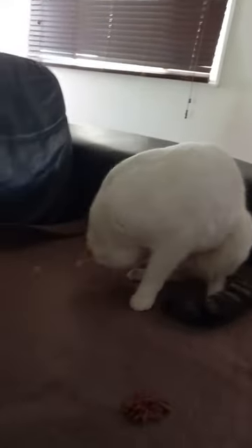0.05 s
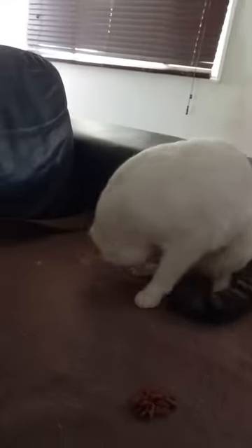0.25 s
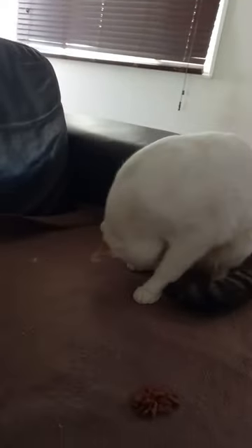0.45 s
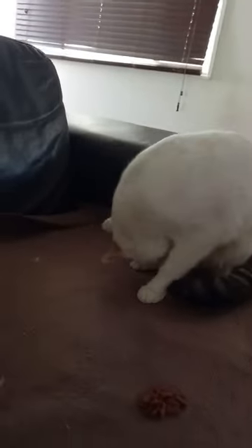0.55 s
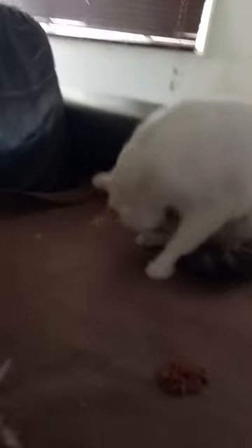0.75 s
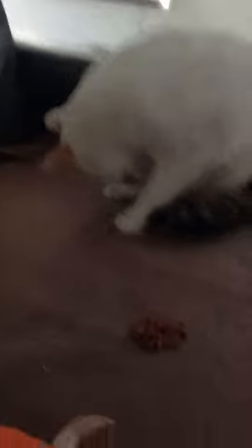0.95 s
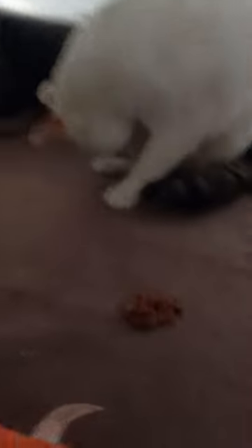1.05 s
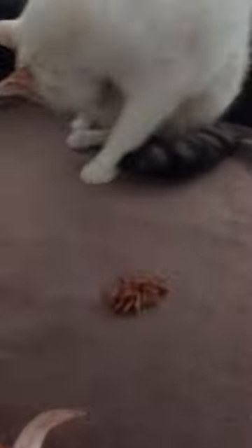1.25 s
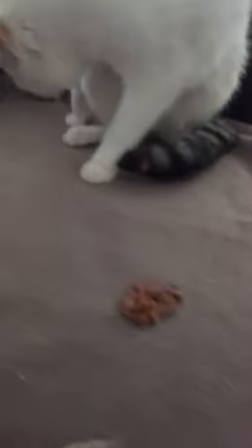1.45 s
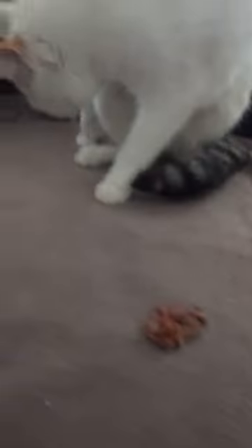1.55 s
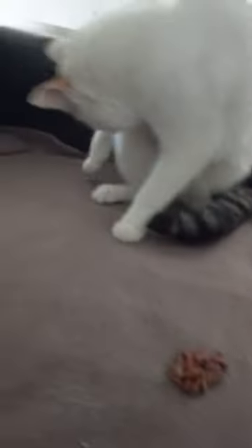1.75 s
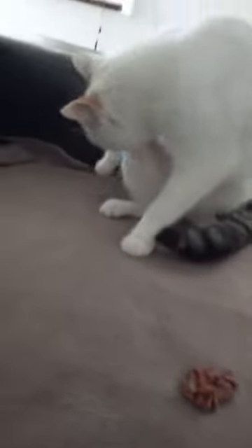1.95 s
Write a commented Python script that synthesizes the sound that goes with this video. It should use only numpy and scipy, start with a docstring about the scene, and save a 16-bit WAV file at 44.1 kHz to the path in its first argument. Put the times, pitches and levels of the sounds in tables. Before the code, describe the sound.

A cat's close, drawn-out growl climbs to a wavering yowl, with soft microphone bumps.

```python
"""A faint hiss, low room noise and brushing cloth open the scene; then a cat growls close by.
Its unsteady vocal folds drive the resonance of its mouth: the low, raspy growl climbs, breaks into
a thin wavering yowl and sinks away in a small room. The hand moves the microphone and bumps it
softly, and there are a few small ticks and one sharper knock."""
import sys
import numpy as np
from scipy import signal
from scipy.fft import rfft, irfft
from scipy.io import wavfile

SR = 44100
rng = np.random.default_rng(int(sys.argv[2]) if len(sys.argv) > 2 else 0)


def to_wav(sig):
    """Store sig (one row per channel, or 1-D mono) as 16-bit WAV at the path in sys.argv[1].

    Samples outside -1..1 are clipped; the rate is SR.
    """
    pcm = np.clip(np.atleast_2d(sig), -1, 1) * 32767
    pcm = np.round(pcm).astype(np.int16)
    wavfile.write(sys.argv[1], SR, pcm.T)  # frames by channels


N = 88200
TIME, FREQ_HZ = np.arange(N) / SR, np.fft.rfftfreq(N, 1 / SR)


def amp(db):
    """Amplitude grows tenfold every 20 dB."""
    return 10 ** (np.asarray(db) / 20)


def unit_rms(x):
    """Normalisation to unit mean power."""
    return x / np.sqrt(np.mean(x ** 2) + 1e-20)


def spectrum_at(table, hz):
    """Interpolation on a logarithmic frequency axis."""
    table_hz, values = np.transpose(table)
    return np.interp(np.log(hz + 1), np.log(table_hz), values)


def curves(table):
    """Linear interpolation of each column over time."""
    time_s, *columns = np.transpose(table)
    return [np.interp(TIME, time_s, column) for column in columns]


def wobble(rate_hz):
    """Low-pass noise: random motion up to a given rate."""
    white = rfft(rng.standard_normal(N))
    return unit_rms(irfft(white / np.sqrt(1 + (FREQ_HZ / rate_hz) ** 4), N))


def pan(balance_db):
    """Constant-power panning; balance is the left level minus the right."""
    half_db = np.atleast_1d(balance_db) / 2
    gains = amp([half_db, -half_db])
    return gains / np.sqrt(np.mean(gains ** 2, axis=0))


# Likeness of left and right noise: frequency_hz, correlation (clipped to -1..1)
CORRELATION = [(60, -0.56), (130, 2.3), (290, 0.52), (640, -0.5), (1400, 0), (15000, 0)]
def stereo_noise(spectrum, balance_db):
    """Partial coherence: two channels of coloured noise share much of their upper bass."""
    left, independent = rfft(rng.standard_normal((2, N)))
    correlation = np.clip(spectrum_at(CORRELATION, FREQ_HZ), -1, 1)
    right = correlation * left + np.sqrt(1 - correlation ** 2) * independent
    panned = np.array([left, right]) * pan(balance_db)
    return unit_rms(irfft(panned * amp(spectrum_at(spectrum, FREQ_HZ)), N))


# Room noise spectrum: frequency_hz, relative_db
AMBIENT_SPECTRUM = [(20, -53), (40, -31), (75, -0.5), (125, -15.5), (195, -6), (300, -2.5), (480, -4.5),
                    (1000, -15), (2000, -31), (3400, -38), (4300, -43.5), (6600, -43), (8000, -42.5),
                    (12000, -43), (15500, -47.5)]
# Its stereo position: frequency_hz, balance_db
AMBIENT_BALANCE = [(60, 6.5), (200, -5.5), (400, -12.5), (1300, 11.5), (2400, -5), (8000, 14),
                   (15000, -1.5)]
def room_noise(level_db=-58.5):
    """Stationary noise with most of its power at low frequencies."""
    return amp(level_db) * stereo_noise(AMBIENT_SPECTRUM, spectrum_at(AMBIENT_BALANCE, FREQ_HZ))


# Hiss spectrum: frequency_hz, relative_db
HISS_SPECTRUM = [(600, 5), (1300, 2), (2200, -5.5), (2900, -7), (3150, -6), (3400, -4.5), (3650, -11),
                 (3950, -18), (6000, -57)]
# Hiss envelope: time_s, level_db
HISS_ENVELOPE = [(0, -61), (.13, -62.5), (.3, -65), (.55, -74), (.8, -70), (1.1, -77.5), (1.55, -72.5),
                 (1.72, -78)]
def hiss():
    """Band-limited noise under a slow envelope, strongest at the start."""
    return amp(curves(HISS_ENVELOPE)[0]) * stereo_noise(HISS_SPECTRUM, balance_db=-14.5)


# Friction spectrum: frequency_hz, relative_db
CLOTH_SPECTRUM = [(1500, -2), (2800, -1), (4200, -3), (6600, 7), (8000, 0.5), (10000, 0), (13000, -5),
                  (15500, -6.5)]
# Brushing strokes: time_s, level_db
CLOTH_ENVELOPE = [(0, -71.5), (.08, -73), (.18, -83.5), (.55, -78), (.76, -77.5), (.94, -68.5), (1.06, -73),
                  (1.2, -72), (1.31, -74.5), (1.48, -63.5), (1.62, -70), (1.72, -82)]
def cloth():
    """Sliding friction of cloth on the microphone makes bright, grainy noise."""
    friction = stereo_noise(CLOTH_SPECTRUM, balance_db=-8)
    grain_db = 1.1 * wobble(rate_hz=360)
    return friction * amp(curves(CLOTH_ENVELOPE)[0] + grain_db)


# Irregularity of the vocal folds: time_s, roughness (0-1)
ROUGHNESS = [(.22, 0.22), (.32, 0.44), (.37, .8), (.41, .15), (.57, 0.28), (.63, 0.58), (.75, 0.33),
             (.86, 0.08), (1.04, 0.4), (1.25, .12), (1.5, 0.3), (1.64, 0.7)]
# The cat's direction as the microphone turns, for 1 kHz and up: time_s, balance_db, left_lead_rad
CAT_DIRECTION = [(.25, -8, 0.2), (.42, -2, 1.2), (.56, -4, 0.92), (.72, -6, 0.65), (.92, -6, 1.76),
                 (1.1, 7, 2.5), (1.25, -3, 2.3), (1.45, -1, 1.82), (1.62, 2, 2)]
MOUTH_HZ, MOUTH_WIDTH_HZ = 921, 100
def voice(contour, pitch_hz, partials_db, mouth_db, jitter=0.022, shimmer=0.29, fade_s=0.012):
    """Source and filter: unsteady vocal folds emit harmonics, and air puffs ring the mouth resonance."""
    inside_s = np.minimum(TIME - contour[0][0], contour[-1][0] - TIME)
    gate = np.clip(inside_s / fade_s + 0.48, 0, 1)
    roughness, = curves(ROUGHNESS)
    unsteady_hz = pitch_hz * (1 + jitter * roughness * wobble(rate_hz=86))
    phase = 2 * np.pi * np.cumsum(unsteady_hz) / SR
    flutter = np.exp(shimmer * roughness * wobble(rate_hz=140))
    balance_db, lead_rad = curves(CAT_DIRECTION)
    airflow = rng.standard_normal(N) * (1 + np.cos(phase)) ** 3  # one puff per cycle
    mouth_band = np.exp(-((FREQ_HZ - MOUTH_HZ) / MOUTH_WIDTH_HZ) ** 2)
    puffs = unit_rms(irfft(rfft(airflow) * mouth_band, N))
    sound = amp(mouth_db - 10.5) * roughness * pan(balance_db) * puffs
    for k, level_db in enumerate(partials_db, 1):
        separation = np.minimum(k * pitch_hz / 1000, 1) ** 2.3  # low partials reach both sides alike
        stereo_phase = np.array([lead_rad, -lead_rad]) * separation / 2
        mouth_lag = np.arctan((k * pitch_hz - MOUTH_HZ) / MOUTH_WIDTH_HZ) + np.pi / 2
        waver_db = 0.98 * np.sqrt(k) * wobble(rate_hz=45)
        partial = np.cos(k * phase + stereo_phase - mouth_lag)
        sound -= amp(level_db + waver_db) * pan(balance_db * separation) * partial
    return np.sqrt(2) * gate * flutter * sound


# Low register, levels before gain: time_s, pitch_hz, fundamental_db, mouth_db
GROWL_CONTOUR = [(0.205, 199.6, -65, -81), (0.23, 200.3, -48.5, -66), (0.265, 187.9, -45.5, -58),
                 (0.3, 232, -38, -51), (0.335, 254.5, -43.5, -46), (0.36, 248.2, -47.5, -53),
                 (0.385, 307.9, -39.5, -44.5), (0.42, 309.5, -41, -43.0), (0.465, 305, -36, -42.5),
                 (0.51, 329.8, -44.5, -44), (0.55, 331.6, -38, -41.5), (0.595, 330.5, -38, -39),
                 (0.618, 317, -43, -45), (0.637, 350.5, -46, -43.5), (0.66, 349.4, -46, -68.5)]
# Mouth resonance as the jaw moves: time_s, centre_hz
MOUTH_GLIDE = [(.25, 946), (.29, 890), (.335, 725), (.37, 766), (.41, 852), (.55, 995.2)]
# Overtone colour with the resonance at MOUTH_HZ: frequency_hz, relative_db
VOCAL_TRACT = [(380, 6), (520, 2), (640, -2.5), (780, -3), (940, 3.5), (1060, -2.5), (1250, -15),
               (1600, -24), (2000, -58.5)]
def growl(gain_db=-2.5):
    """Formant filtering: the moving mouth shapes the overtones above a strong fundamental."""
    pitch_hz, fundamental_db, mouth_db = curves(GROWL_CONTOUR)
    formant_ratio = curves(MOUTH_GLIDE)[0] / MOUTH_HZ
    overtones_db = [mouth_db + spectrum_at(VOCAL_TRACT, k * pitch_hz / formant_ratio)
                    for k in range(2, 7)]
    return amp(gain_db) * voice(GROWL_CONTOUR, pitch_hz, [fundamental_db] + overtones_db, mouth_db)


# Reverberation time of the small room: frequency_hz, t60_s
ROOM_DECAY = [(150, 0.13), (400, 0.59), (1000, .28), (8000, 0.15)]
def in_room(direct, reverb_db):
    """Reverberation: sparse reflections follow the direct sound and linger longest near 400 Hz."""
    reflections = rng.standard_normal((2, SR // 2)) * (rng.random((2, SR // 2)) < 0.1)
    reflections[:, :150] = 0  # travel time of the first reflection
    hz, age_s, bands = signal.stft(reflections, SR, nperseg=256)
    decay = amp(-60 * age_s / spectrum_at(ROOM_DECAY, hz)[:, None])
    tail = signal.istft(bands * decay, SR, nperseg=256)[1]
    reverb = signal.fftconvolve(direct, tail / np.linalg.norm(tail[0]), axes=1)[:, :N]
    return direct + amp(reverb_db) * reverb


# Air noise in the throat: frequency_hz, relative_db
RASP_SPECTRUM = [(35, -49.5), (100, -15), (200, 4.5), (330, -0.5), (480, -6), (700, -4.5), (950, -11.5),
                 (1200, -10), (1600, -16.5), (2200, -22.5), (3500, -37.5), (8000, -53)]
# Breath envelope: time_s, level_db
RASP_ENVELOPE = [(.21, -76), (.28, -51.5), (.37, -52), (.5, -51), (.63, -49), (.74, -54.5), (.93, -53),
                 (1.05, -55), (1.22, -55.5), (1.48, -54.5), (1.6, -59.5), (1.7, -61.5)]
def rasp():
    """Turbulent air in the throat adds fluttering noise under both registers."""
    breath = stereo_noise(RASP_SPECTRUM, balance_db=-4)
    flutter_db = 1.23 * wobble(rate_hz=13)
    return breath * amp(curves(RASP_ENVELOPE)[0] + flutter_db)


# Nudges of the hand: start_s, length_s, level_db, centre_hz
HAND_BUMPS = [(0.292, 0.2, -60.5, 75), (0.414, 0.11, -59, 76.8), (.58, 0.069, -63.5, 82),
              (0.804, 0.092, -65.5, 76), (0.902, .14, -58.5, 80), (1.017, 0.067, -52, 227),
              (1.326, 0.15, -62.5, 76), (1.868, 0.11, -56.5, 202.4), (1.933, 0.043, -64, 75.1)]
def bumps(pitch_spread=0.14):
    """Structure-borne sound: each nudge shakes the microphone at a low, wandering frequency."""
    sound = np.zeros(N)
    for start_s, length_s, level_db, centre_hz in HAND_BUMPS:
        hz = centre_hz * (1 + pitch_spread * wobble(rate_hz=centre_hz / 2))
        swell = np.sin(np.pi * np.clip((TIME - start_s) / length_s, 0, 1))
        sound += amp(level_db) * swell * np.sin(2 * np.pi * np.cumsum(hz) / SR)
    return sound


# Small ticks: start_s, level_db, centre_hz, width_octaves, balance_db
TICK_BURSTS = [(0.611, -56.5, 10830, .8, -8.5), (.691, -57, 6167, 0.27, -8), (0.78, -57, 9000, 0.98, -5),
               (.829, -62, 13230, .4, -8), (0.9375, -51, 5150, 0.54, -4), (.945, -64, 10800, 0.64, 11),
               (0.9512, -46, 10040, 1, -23), (1.0045, -51, 10000, 0.95, -30)]
def ticks(decay_s=0.0005):
    """Short transients have broad spectra; each burst is filtered to its own treble band."""
    sound = np.zeros((2, N))
    for start_s, level_db, centre_hz, width_octaves, balance_db in TICK_BURSTS:
        burst = rng.standard_normal(N) * (TIME >= start_s) * np.exp(-abs(TIME - start_s) / decay_s)
        band = np.exp(-(np.log2((FREQ_HZ + 1) / centre_hz) / width_octaves) ** 2 / 2)
        tick = irfft(rfft(burst) * band, N)
        sound += amp(level_db) * pan(balance_db) * tick / abs(tick).max()
    return sound


# High register, levels before gain: time_s, pitch_hz, fundamental_db, mouth_db, third_partial_db
YOWL_CONTOUR = [(0.66, 424.3, -59, -45, -73), (0.685, 487.4, -61, -45, -71), (0.715, 448, -62.5, -45, -68),
                (0.735, 492.3, -72, -52, -80), (0.757, 440.3, -68, -45.5, -64.5),
                (0.782, 493.6, -75, -37.5, -70), (0.808, 470.4, -71, -39.0, -57.5),
                (0.83, 489.6, -78, -38.5, -58), (0.88, 496.7, -58.0, -38, -50.5),
                (0.925, 505, -53.5, -40.5, -42), (0.952, 502.3, -58.5, -38.5, -57),
                (0.972, 527, -61, -63, -63.0), (0.995, 535.3, -43, -67, -68), (1.035, 491, -51, -58, -67.5),
                (1.06, 633, -47, -75, -93), (1.085, 579.9, -50, -47.5, -71),
                (1.125, 568.2, -51.5, -53, -57.5), (1.165, 515.2, -44, -49.5, -56.0),
                (1.21, 503, -56, -44.5, -55.5), (1.27, 519.6, -50.5, -49, -58.0),
                (1.32, 514, -72, -50, -62.5), (1.365, 501.5, -47.5, -43.0, -67),
                (1.412, 456.5, -66, -51.5, -101), (1.435, 483.1, -61, -43.5, -48),
                (1.5, 463.5, -62.5, -46.5, -63), (1.56, 472.2, -53, -50, -66),
                (1.61, 414.6, -57.5, -52.5, -59.5), (1.635, 467.7, -48, -60, -70),
                (1.675, 437.4, -82, -68, -74)]
# Partials four and five against the third, before brightening: frequency_hz, relative_db
YOWL_TREBLE = [(1850, -12), (2050, -17.5), (2250, -39), (2420, -39.5), (2550, -23), (2700, -44.5)]
def yowl(gain_db=-0.5, brightening=1.1, neutral_db=-43.5):
    """Formant tuning: the second partial lies near the mouth resonance; effort brightens the top."""
    pitch_hz, fundamental_db, mouth_db, third_db = curves(YOWL_CONTOUR)
    effort_db = brightening * (mouth_db - neutral_db)
    top_db = [third_db + spectrum_at(YOWL_TREBLE, k * pitch_hz) + effort_db for k in (4, 5)]
    partials_db = [fundamental_db, mouth_db, third_db] + top_db
    return amp(gain_db) * voice(YOWL_CONTOUR, pitch_hz, partials_db, mouth_db)


# Modes of the knock: frequency_hz, level_db, t60_s
KNOCK_MODES = [(1450, -48.5, 0.013), (2140, -39.5, 0.0058), (2870, -49, 0.0017), (4130, -58, 0.0038)]
def knock(start_s=0.9912):
    """Modal vibration: a small hard tap excites a few quickly damped sinusoids."""
    age_s = np.maximum(TIME - start_s, 0)
    ring = sum(amp(level_db - 60 * age_s / t60_s) * np.sin(2 * np.pi * hz * age_s)
               for hz, level_db, t60_s in KNOCK_MODES)
    return pan(balance_db=0) * ring


def scene():
    """Superposition: the cat, the small noises and the background add as sound pressures."""
    cat = growl() + yowl()
    background = room_noise() + hiss()
    sound = background + in_room(cat, reverb_db=-13.5) + rasp() + cloth() + bumps()
    return sound + in_room(ticks(), reverb_db=-5) + in_room(knock(), reverb_db=-5)


# Microphone response, dull just above 7 kHz: frequency_hz, gain_db
MIC_RESPONSE = [(6900, 0.5), (7500, -14), (8800, -10), (11000, -3), (13000, 1.5)]
def record(dry, cutoff_hz=15720):
    """Linear filtering: the microphone colours the sound and a steep low-pass limits its bandwidth."""
    coloured = irfft(rfft(dry) * amp(spectrum_at(MIC_RESPONSE, FREQ_HZ)), N)
    low_pass = signal.firwin(511, cutoff_hz, window=("kaiser", 9), fs=SR)
    return signal.oaconvolve(coloured, low_pass[None], "same")


dry = scene()
out = record(dry)
to_wav(out)
```